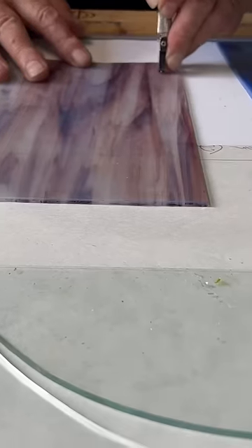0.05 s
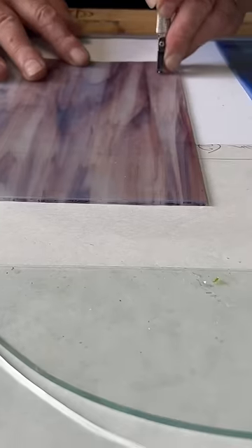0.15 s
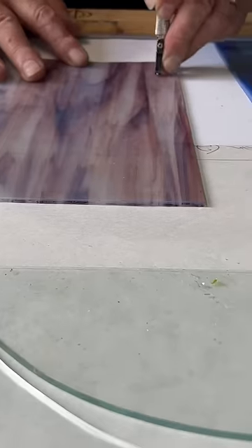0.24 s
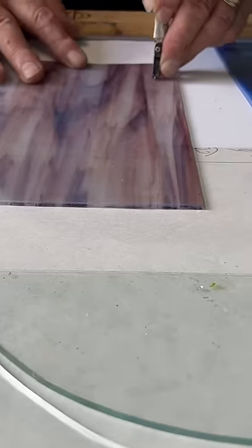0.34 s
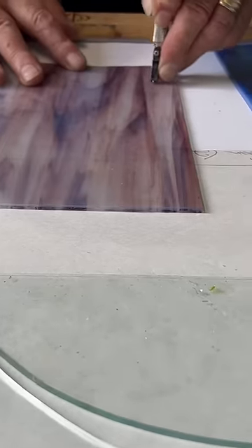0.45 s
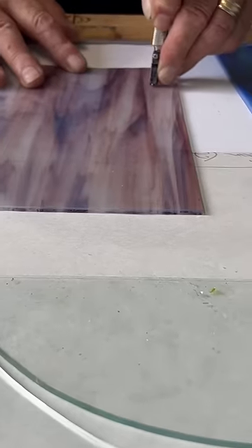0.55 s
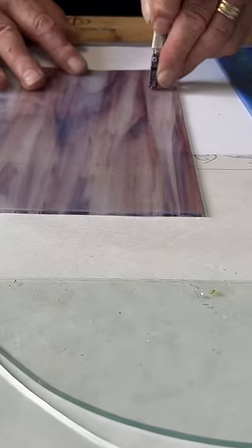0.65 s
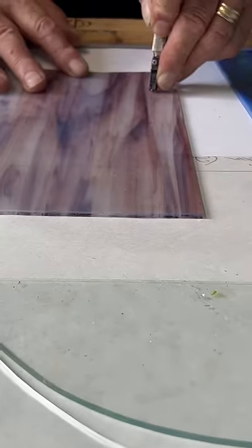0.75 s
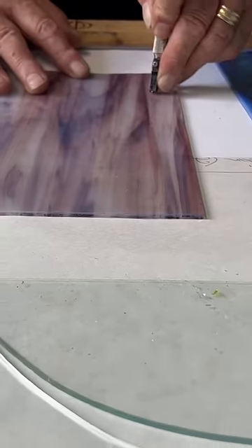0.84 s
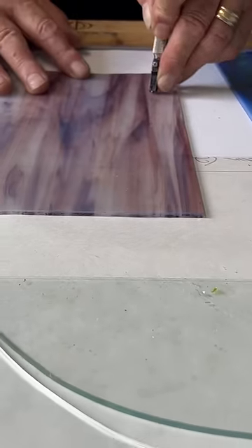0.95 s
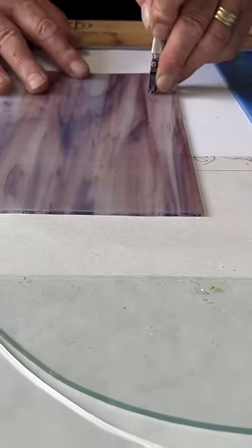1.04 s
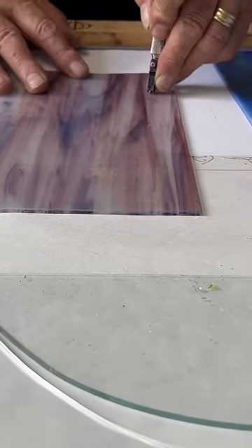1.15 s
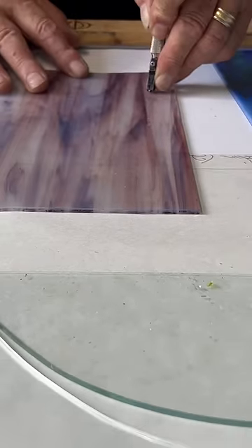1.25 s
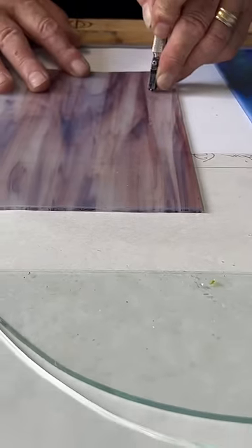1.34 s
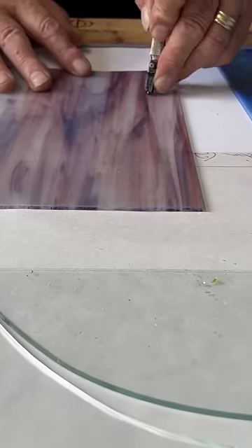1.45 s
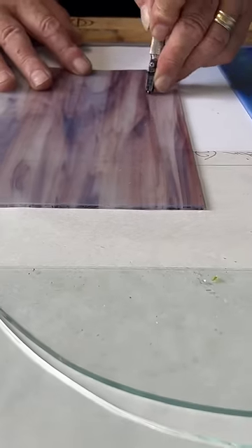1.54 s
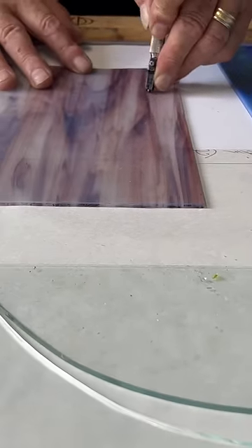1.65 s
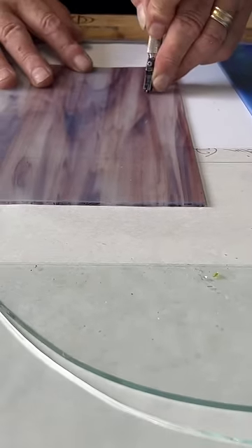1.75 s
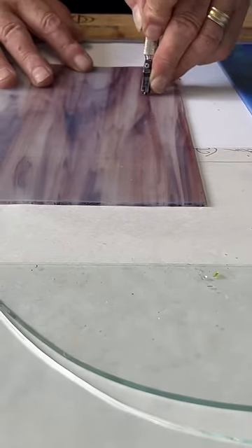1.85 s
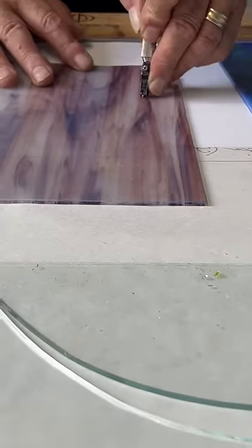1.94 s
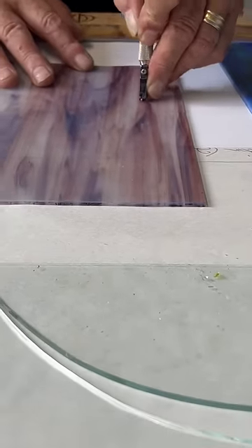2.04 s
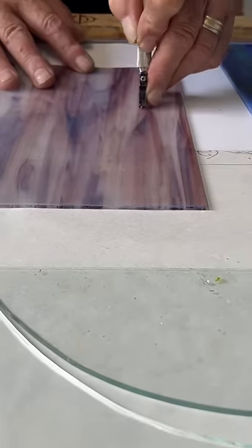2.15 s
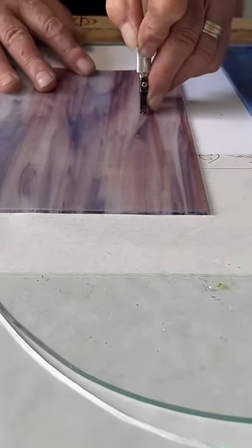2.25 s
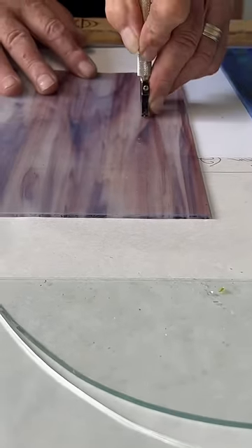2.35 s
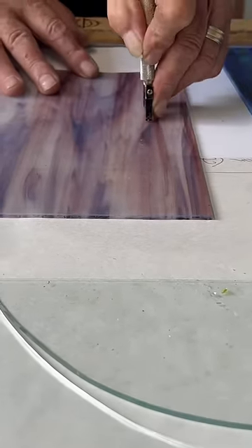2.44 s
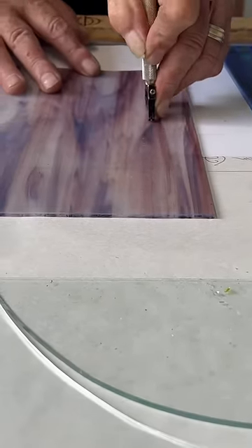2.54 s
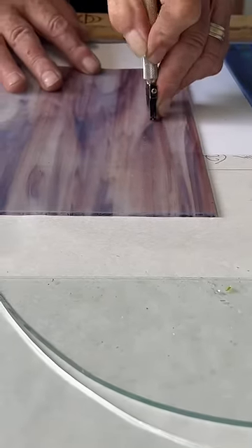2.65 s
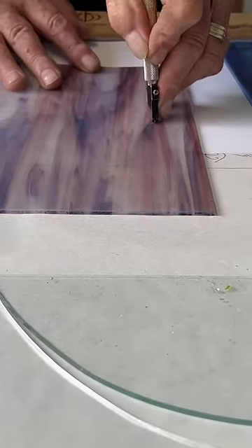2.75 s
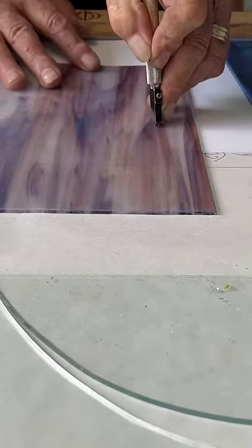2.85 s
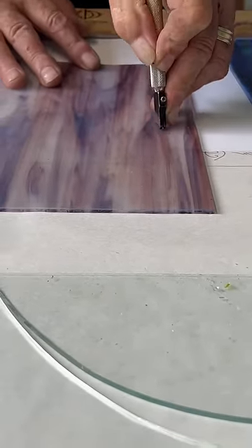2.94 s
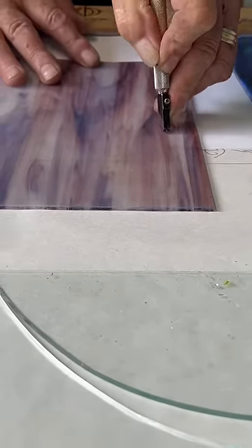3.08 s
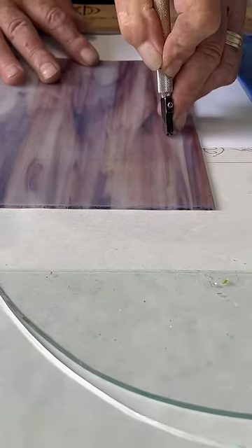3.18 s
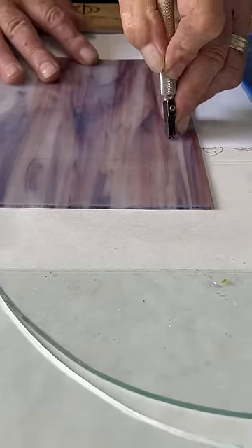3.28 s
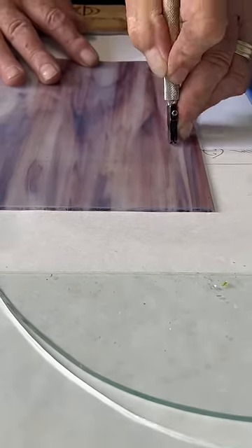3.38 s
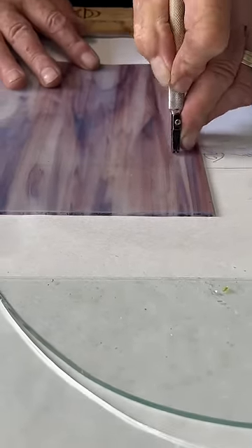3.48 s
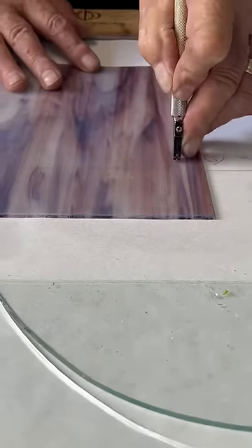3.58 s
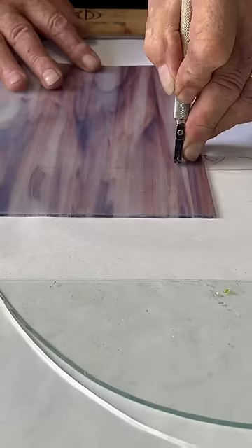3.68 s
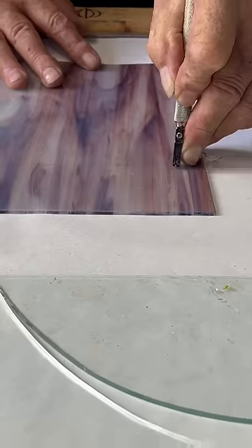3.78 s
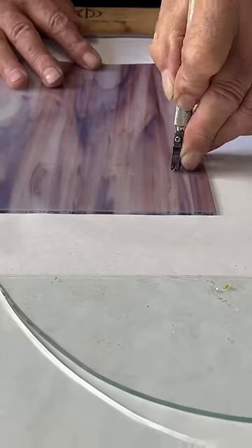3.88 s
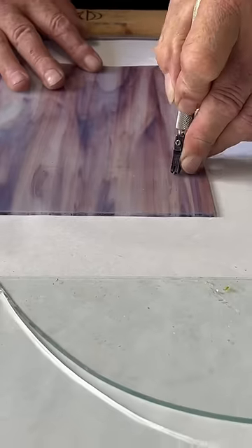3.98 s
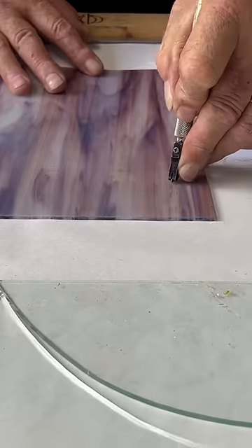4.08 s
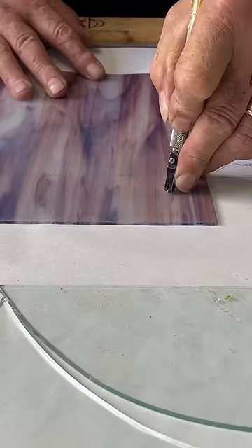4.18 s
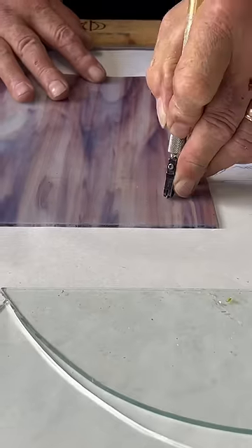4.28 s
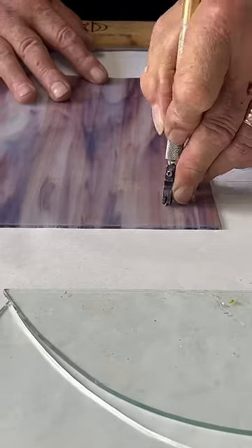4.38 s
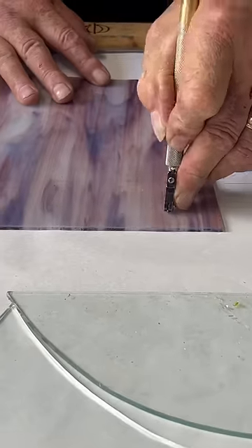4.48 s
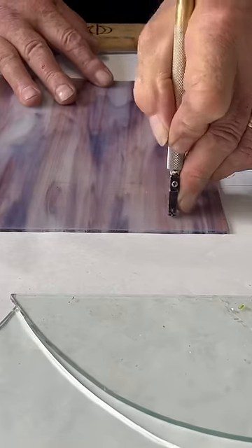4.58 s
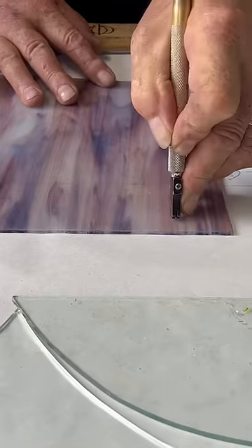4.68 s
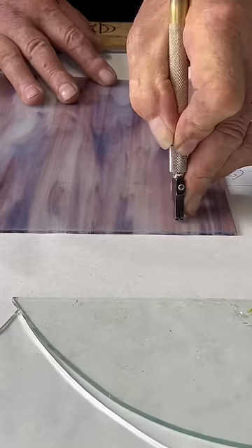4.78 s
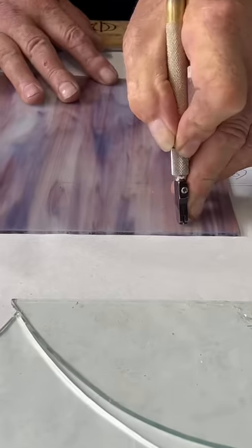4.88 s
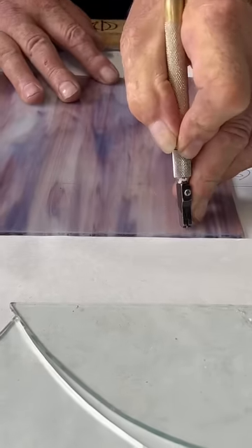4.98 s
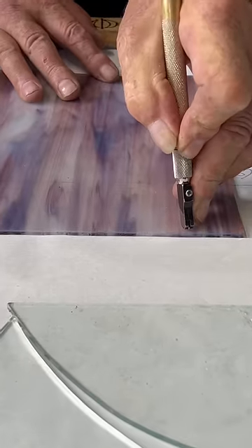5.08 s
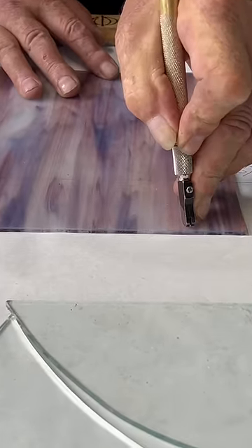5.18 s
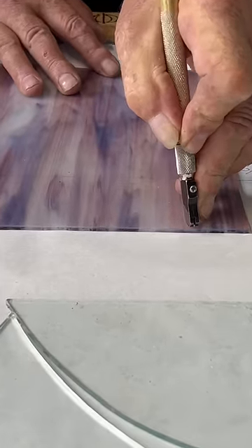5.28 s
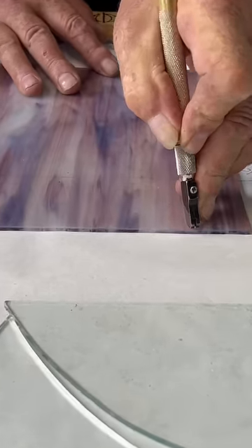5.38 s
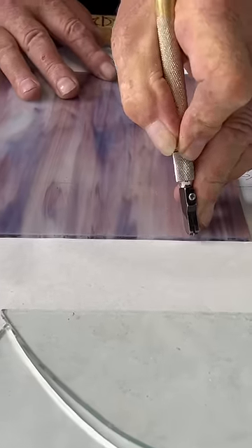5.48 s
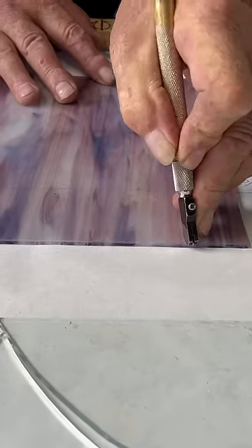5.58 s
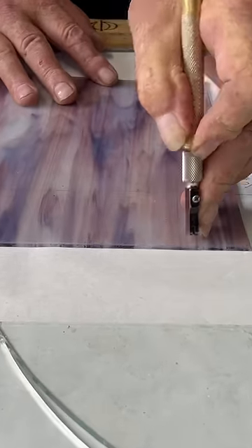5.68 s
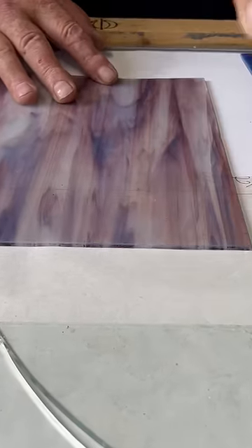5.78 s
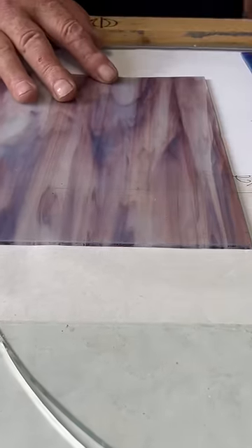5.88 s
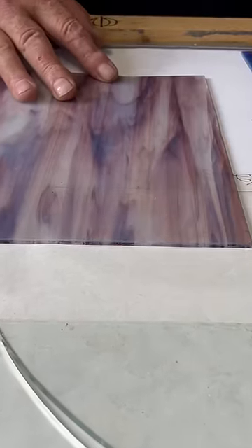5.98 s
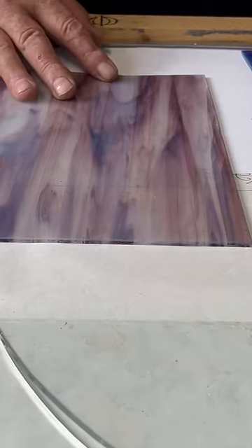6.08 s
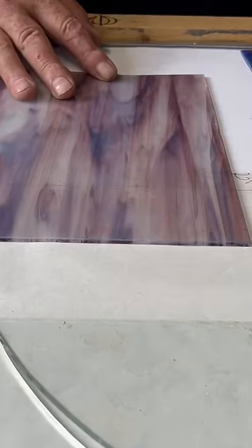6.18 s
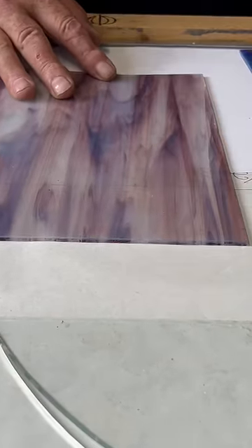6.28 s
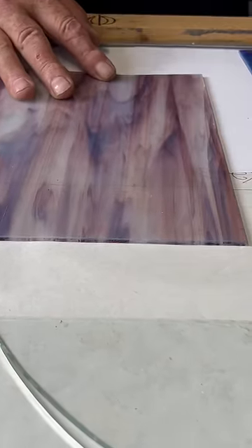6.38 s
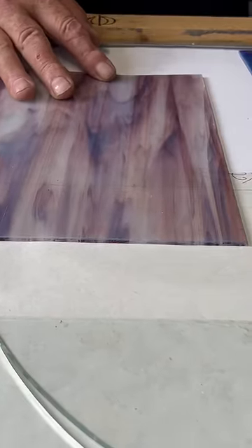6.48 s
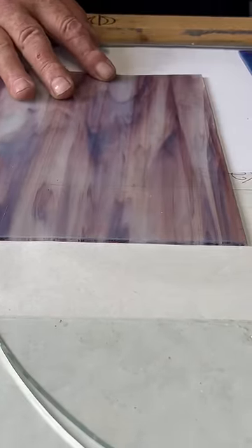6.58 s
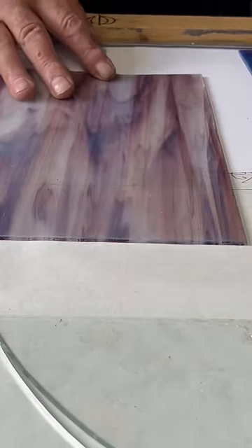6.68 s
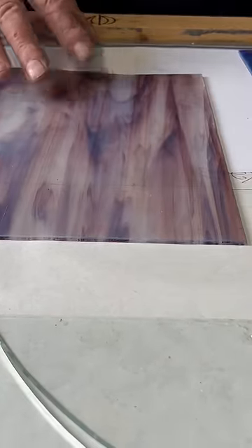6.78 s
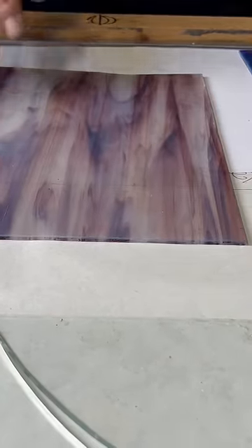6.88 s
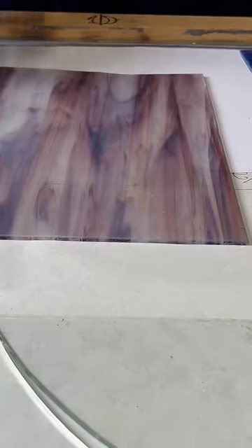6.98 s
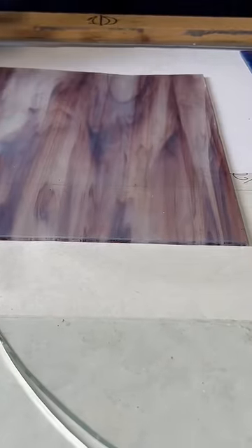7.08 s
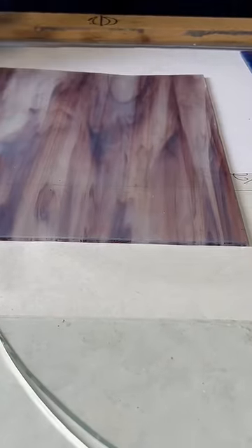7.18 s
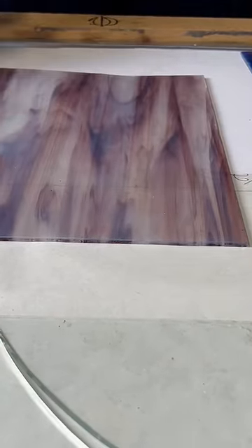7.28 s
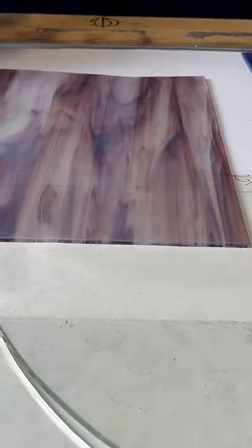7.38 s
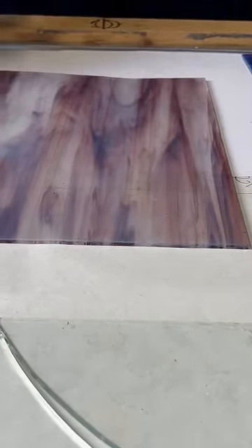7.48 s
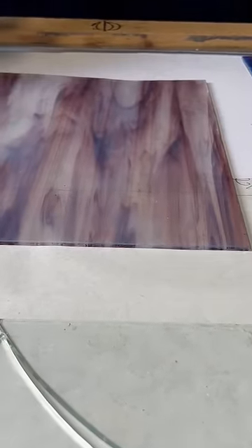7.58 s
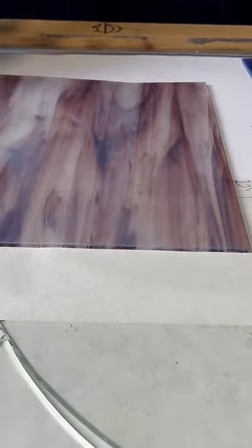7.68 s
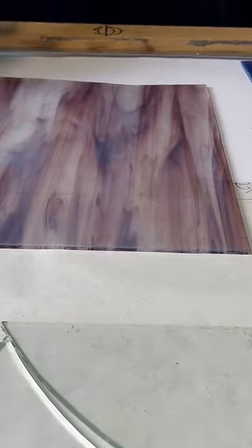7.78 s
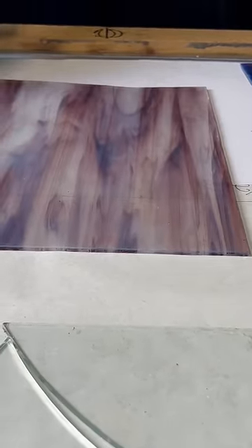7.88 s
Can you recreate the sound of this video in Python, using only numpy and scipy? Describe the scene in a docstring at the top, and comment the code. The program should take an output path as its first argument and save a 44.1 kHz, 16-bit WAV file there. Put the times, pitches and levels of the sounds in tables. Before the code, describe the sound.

A low machine hum wavers throughout in a small workshop, heard closely in stereo, with soft table rumble from leaning hands. Faint paper rustling opens; from 0.3 to 0.9 seconds brittle glass cracks come irregularly with small dull taps. At 1.0 a loud, hard snap rings briefly with a table knock. Sparse cracks follow until 1.8, then gritty, bright scratching runs in bursts to about 2.4, slightly left. From 2.6 to 5.5 the wheel rolls very faintly, with isolated cracks and tiny scratches around 2.9, 3.2 and 3.8-4.6. At 5.52 it drops off the edge: a sharp double snap, glass slap and deep thump with short echo. Light metallic ticks follow at 5.8-5.9, then near quiet. At 6.5 the tool lands with a hollow, ringing clonk and small bounces, slightly right. Ticks, knocks and paper sliding continue from 6.6 to 7.4, with a last small tap at 7.7.

```python
"""Hand glass cutter on a work table

A hand cutter is pulled in fits and starts across a sheet of glass on paper: single cracks, gritty runs, loud snaps.
Clicks scattered into short noise tails ring shaped bodies; dense grains make the runs and decaying sines the thumps.
The wheel drops off the edge and thumps the table; the tool is laid down with a hollow clonk off to the right.
Glass is handled, hands lean and slide in filtered noise, and a machine hums as wavering sines in a small workshop.
"""
import sys
import numpy as np
from scipy import signal
from scipy.fft import rfft, irfft
from scipy.io import wavfile

SR = 44100
rng = np.random.default_rng(int(sys.argv[2]) if len(sys.argv) > 2 else 0)


def persist_wave(psi):
    """Save psi, clipped to +-1, as 16-bit WAV."""
    counts = np.round(np.clip(psi, -1, 1) * 32767).astype(np.int16)
    wavfile.write(sys.argv[1], SR, np.atleast_2d(counts).T)


N = 349713
TIME = np.arange(N) / SR
SHORT = TIME[:8192]
SHORT_HZ = np.fft.rfftfreq(len(SHORT), 1 / SR).clip(1)

# unbroken runs of scoring: (start [s], end [s], level [dB], spectral centre [Hz])
SCORING_RUNS = [(0.553,0.563,-34,3900), (1.8773,1.883,-30.5,4540), (1.89,1.9,-37,4200),
                (1.917,1.996,-36,4240), (2.011,2.195,-35,4530), (2.342,2.426,-34.5,4400),
                (3.23,3.241,-32.5,4000), (4.022,4.044,-34,4600), (4.369,4.413,-37,4500),
                (4.434,4.462,-37,4800), (4.528,4.565,-44,4800)]
# knocks on the table top: (time [s], level [dB], contact softness as cut-off [Hz], rattle t60 [s],
# left minus right [dB], level of the deep table thump [dB])
TABLE_KNOCKS = [(.752,-43.5,1110,0.026,0.5,-51.5), (1.008,-31,448,0.05,-0.5,-32.5),
                (1.372,-52.5,394,0.037,1.5,-32.5), (2.878,-72,347,0.061,0,-37), (3.904,-39,756,0.02,-1,-28),
                (5.527,-17,380,0.066,0.5,-12.5), (6.5212,-23,2050,0.08,-2.5,-42),
                (6.615,-35,900,0.04,-4.5,-33), (6.690,-30.5,1910,0.081,-3,-40),
                (6.733,-38.5,700,0.049,-1.5,-31), (7.110,-28.5,450,0.025,-2.5,-36),
                (7.137,-43,230,0.03,2,-20.5), (7.336,-47,350,.02,4,-46), (7.391,-51.5,1500,0.039,0,-65),
                (7.672,-42,1106,0.01,0,-41.5)]
# broad spectrum of the cracking sheet: (frequency [Hz], level [dB])
GLASS_SPECTRUM = [(150,-16.5), (500,-9), (1100,-11), (1800,-4), (3000,-1.5), (6000,-4), (7500,-4),
                  (9500,-11.5), (10500,-15.5), (15500,-16), (17000,-33.5)]
# a push or roll builds and eases off (s)
PUSH_ATTACK_S, PUSH_RELEASE_S = 0.01, 0.023


def from_db(db):
    """Amplitude factor of a level in dB."""
    return 10 ** (np.asarray(db) / 20)


def unit_energy(x):
    """Scale each channel so that its squares sum to one."""
    return x / np.sqrt(np.sum(x ** 2, axis=-1, keepdims=True) + 1e-20)


def at_hz(points, hz):
    """Read a curve over frequency, straight between its points on a log axis."""
    points = np.array(points)
    return np.interp(np.log(hz), np.log(points[:, 0]), points[:, 1])


def drift(rate):
    """Smooth chance with spread 1 and about `rate` turns a second."""
    return np.interp(TIME * rate, np.arange(8192), rng.standard_normal(8192)) / np.sqrt(2 / 3)


def gesture(start, end, attack_s, release_s):
    """Gain over time: a straight rise from `start`, times an exponential release after `end`."""
    return np.clip((TIME - start) / attack_s, 0, 1) * np.exp(-np.maximum(TIME - end, 0) / release_s)


def stereo_noise(alike, size):
    """White noise in two channels with correlation `alike`."""
    mid, side = rng.standard_normal((2, size))
    alike = np.clip(alike, 0, 1)
    return np.sqrt((1 + alike) / 2) * mid + np.sqrt((1 - alike) / 2) * side * [[1], [-1]]


def panned(x, left_db):
    """Balance by level alone: left minus right in dB."""
    return x * from_db([[left_db / 2], [-left_db / 2]])


def placed(x, left_db):
    """A sound off to one side is louder in the nearer ear and reaches the other a little later."""
    t = TIME[:x.shape[-1]]
    lags = np.maximum(np.array([-left_db, left_db]) * 0.00012, 0)  # seconds
    late = [np.interp(t - lag, t, ear, left=0) for ear, lag in zip(x, lags)]
    return panned(np.array(late), left_db)


def through(x, response):
    """Filter a sound with an impulse response, keeping its length."""
    return signal.oaconvolve(x, np.atleast_2d(response), axes=-1)[:, :x.shape[-1]]


def add(out, s, sound):
    """Mix a sound in at time s."""
    start = max(round(s * SR), 0)
    out[:, start:start + sound.shape[-1]] += sound[..., :N - start]


def body(spectrum, modes=(), extra_db=0):
    """Causal (minimum-phase) response of unit energy: a broad spectrum lifted at each resonance."""
    db = at_hz(spectrum, SHORT_HZ) + extra_db
    for hz, width, lift_db in modes:
        db = db + lift_db / (1 + (2 * (SHORT_HZ - hz) / width) ** 2)
    # folding the cepstrum forward in time gives the minimum phase
    cepstrum = irfft(np.log(from_db(db)))
    cepstrum[len(SHORT) // 2:] = 0
    return unit_energy(irfft(np.exp(2 * rfft(cepstrum))))


def softened(soft_hz, steepness=6.02):
    """Negative dB by frequency: what a soft contact takes from the treble."""
    return -10 * np.log10(1 + (SHORT_HZ / soft_hz) ** steepness)


def contact(t60, scatter_db, alike):
    """A sharp click, then bending waves scattered from the edges of the plate."""
    fading_noise = stereo_noise(alike, size=len(SHORT)) * from_db(-60 * SHORT / t60)
    waves = from_db(scatter_db) * unit_energy(fading_noise)
    waves[:, 0] += 1
    return unit_energy(waves)


def blow(level_db, soft_hz, rattle_s, spectrum, modes):
    """One blow on a body; a soft contact leaves out the treble."""
    hit = contact(t60=rattle_s, scatter_db=6.0, alike=0.44)
    return from_db(level_db) * through(hit, body(spectrum, modes, softened(soft_hz)))


def struck(modes, soft_hz, spread_db=2.0):
    """Decaying modes with new strengths at each blow; a soft contact reaches only the lowest."""
    t = TIME[:SR // 2]
    ring = 0
    for k, (hz, db, t60) in enumerate(modes):
        fade = from_db(db + spread_db * rng.standard_normal() - 60 * t / t60)
        softness = np.hypot(1, (hz / soft_hz) ** 2)
        ring = ring + (-1) ** k * fade * np.sin(2 * np.pi * hz * t) / softness
    return ring


def background(air_db=-51.5, hum_waver_db=4.5, hum_wander=1.0):
    """Wavering machine hum, its phase wandering in radians, over still air."""
    # lines of the machine hum: (frequency [Hz], level [dB])
    hum_lines = [(31,-65), (46.3,-69), (108.5,-56.5), (120,-51.5), (162,-67)]
    # spectrum of the still air: (frequency [Hz], level [dB])
    air_spectrum = [(25,-10.5), (60,-0.5), (110,10), (200,-10), (380,-17), (600,-31.5), (3000,-38),
                    (7000,-46), (10000,-54.5), (16000,-66.5)]
    hum = 0
    for hz, db in hum_lines:
        level = np.sqrt(2) * from_db(db + hum_waver_db * drift(6.5))
        hum = hum + level * np.sin(2 * np.pi * hz * TIME + hum_wander * drift(3.9))
    air = from_db(air_db) * through(stereo_noise(0.55, size=N), body(air_spectrum))
    return hum + air


def workshop(x, gap_s=0.0062, build_s=0.0012):
    """Diffuse echo that builds up after a short gap and dies band by band; the bass is alike in both ears."""
    # strength of the echo: (frequency [Hz], level [dB])
    echo_spectrum = [(100,-7.5), (500,-3), (1300,-2), (2300,-8.5), (3500,-12), (6000,-11), (9000,-6),
                     (16000,-21.5)]
    # reverberation time: (frequency [Hz], t60 [s])
    reverb_times = [(100,0.4), (300,0.45), (1500,0.47), (3000,.46), (5000,0.42), (9000,0.33), (16000,0.35)]
    t, tail = TIME[:SR * 2 // 3], 0
    edges = np.geomspace(60, 17000, num=13)
    for low, high in zip(edges, edges[1:]):
        hz = np.sqrt(low * high)
        band_filter = signal.butter(2, [low, high], "band", fs=SR, output="sos")
        band = signal.sosfilt(band_filter, stereo_noise(1 / (1 + (hz / 380) ** 2), size=len(t)))
        fade = np.clip((t - gap_s) / build_s, 0, 1) * from_db(-60 * t / at_hz(reverb_times, hz))
        strength = from_db(at_hz(echo_spectrum, hz)) * np.sqrt(2 * (high - low) / SR)
        tail = tail + unit_energy(band * fade) * strength
    return through(x, tail)


def effort(resting_db=-8):
    """How hard the hands bear down, as a gain: their resting weight plus the pushes."""
    # spells of bearing down on the table: (start [s], end [s], effort [dB])
    pushes = [(0.342,0.746,-5.5), (1.372,1.46,-1.5), (1.84,2.225,-3), (2.723,2.942,-1), (3.052,3.142,-1.5),
              (3.448,3.514,-2), (3.68,3.76,-4), (4.044,4.169,1.5), (4.335,4.467,0.5), (6.592,6.794,1.5),
              (7.01,7.212,4), (7.55,7.687,-6.5)]
    pushing = sum(from_db(db) * gesture(start, end, PUSH_ATTACK_S, PUSH_RELEASE_S)
                  for start, end, db in pushes)
    return np.hypot(from_db(resting_db), pushing)


def hands(rumble_db=-43.0, rub_db=-54.5, rub_growth=1.5):
    """Leaning hands make the table rumble; the palms rub unevenly, growing faster with effort."""
    # spectrum of the rumbling table: (frequency [Hz], level [dB])
    rumble_spectrum = [(20,-48.5), (40,-14.5), (65,4), (85,-11.5), (115,4), (145,-5.5), (200,-26.5),
                       (600,-52), (3000,-79.5)]
    # spectrum of the rubbing palms: (frequency [Hz], level [dB])
    palm_spectrum = [(60,-14), (160,4.5), (250,-1), (330,-16.5), (500,-15), (800,-22), (1500,-29),
                     (5000,-63.5)]
    weight = effort()
    waver_db = 2.5 * drift(12)
    leaning = stereo_noise(0.92, size=N) * weight * from_db(rumble_db)
    rubbing = stereo_noise(1.0, size=N) * weight ** rub_growth * from_db(rub_db + waver_db)
    return through(leaning, body(rumble_spectrum)) + through(rubbing, body(palm_spectrum))


def friction(level, response, grain_db, grain_rate):
    """Rubbing: a hiss that catches and lets go in small grains."""
    grip = np.sqrt(N) * unit_energy(from_db(grain_db * drift(grain_rate)))
    return through(stereo_noise(0.19, size=N) * grip * level, response)


def slap_modes():
    """Resonances of the sheet slapping on the table."""
    # (frequency [Hz], width [Hz], lift [dB])
    return [(430,80,13.5), (1295,210,8), (2000,260,5), (2600,260,6.5)]


def slap_spectrum():
    """Broad spectrum of the sheet slapping on the table."""
    # (frequency [Hz], level [dB])
    return [(80,-28), (250,-9), (700,-10), (1000,-7.5), (1800,-4), (3000,-7), (5000,-11.5), (9000,-2.5)]


def sliding(catches_per_s=30, catch_db=24.0, soft_hz=2200):
    """Fingers and glass shift on the paper with a fine hiss, in which the sheet catches and taps softly."""
    # strokes of paper and fingers: (start [s], start of the release [s], level [dB])
    strokes = [(0,-0.08,-58), (0.179,0.206,-59), (0.41,0.508,-59), (1.363,1.34,-69), (5.85,6,-63.5),
               (6.991,7,-55.5), (7.203,7.5,-62.5), (7.804,8,-56.5)]
    # spectrum of the paper: (frequency [Hz], level [dB])
    paper_spectrum = [(200,1.5), (700,1), (1800,-1.5), (3500,-6), (6000,-10.5), (7500,-18.5), (9500,-20.5),
                      (11000,-47), (16000,-49.5)]
    level = sum(from_db(db) * gesture(start, end, attack_s=0.0032, release_s=0.14)
                for start, end, db in strokes)
    catches = (rng.random(N) < catches_per_s / SR) * rng.standard_normal(N) * level * from_db(catch_db)
    sheet = body(slap_spectrum(), slap_modes(), softened(soft_hz))
    caught = through(np.array([catches, catches]), sheet)
    return caught + friction(level, body(paper_spectrum), grain_db=2.2, grain_rate=600)


def glass_modes(depth):
    """The resonances of the sheet stand out more the harder the wheel is pressed in."""
    # resonances (and notches between them) of sheet and cutter head: (frequency [Hz], width [Hz], lift [dB])
    sheet_modes = [(778,110,6), (1833,52,6), (2020,95,8.5), (2390,65,-1.5), (2640,200,5.5), (3120,190,9),
                   (3617,110,8.5), (4060,270,-3.5), (4704,220,8.5), (5100,180,-1.5), (5590,370,6),
                   (6093,310,8), (6960,250,0.5), (8380,1100,5.5), (9300,250,6)]
    return [(hz, width, depth * lift_db) for hz, width, lift_db in sheet_modes]


def tilted(centre_hz, swell_hz=1700, middle_hz=4540, tilt_db=3.0):
    """dB by frequency for a brighter or duller crack; a dull one swells the lowest band the sheet radiates well."""
    # tilt in dB per octave, for each octave that the centre lies from the middle; mirrored below the swell
    mirrored_hz = np.maximum(SHORT_HZ, swell_hz ** 2 / SHORT_HZ).clip(None, 12000)
    return tilt_db * np.log2(centre_hz / middle_hz) * np.log2(mirrored_hz / middle_hz)


def travelling(drive, start, end, spectrum, centre_hz, depth, travel_s=0.045, travel_db=2.5):
    """The sheet rung by a moving wheel: the balance of its resonances fades from one place to the next."""
    out, hop = np.zeros((2, N)), round(travel_s * SR)
    for first in range(max(round(start * SR) - hop, 0), round(end * SR) + hop, hop):
        modes = [(hz, width, lift_db + travel_db * rng.standard_normal())
                 for hz, width, lift_db in glass_modes(depth)]
        piece = drive[:, first:first + 2 * hop] * np.hanning(2 * hop)
        sheet = body(spectrum, modes, tilted(centre_hz))
        add(out, first / SR, signal.fftconvolve(piece, sheet[None], axes=-1))
    return out


def rolling(waver_db=3.0, gain_db=-0.5):
    """The rolling wheel stirs the sheet lightly, in fine grains, swelling as the hand's speed wavers."""
    # faint rub until the wheel drops off the edge: (start [s], end [s], level [dB], spectral centre [Hz])
    rolls = [(2.618,2.997,-68.5,1600), (3.042,3.503,-65.5,3200), (3.56,4.366,-70,4500),
             (4.6,5.51,-66.5,6980)]
    # spectrum of the rolling wheel: (frequency [Hz], level [dB])
    wheel_spectrum = [(200,8), (700,9.5), (1200,8), (2000,8), (3000,4.5), (5000,4.5), (6500,0), (9000,-8),
                      (10500,-21), (16000,-21.5)]
    grain_db = 2.5 * drift(350)
    rub = stereo_noise(0.13, size=N) * from_db(waver_db * drift(11) + grain_db)
    out = np.zeros((2, N))
    for start, end, db, hz in rolls:
        drive = rub * gesture(start, end, PUSH_ATTACK_S, PUSH_RELEASE_S)
        rolled = travelling(drive, start, end + PUSH_RELEASE_S, wheel_spectrum, hz, depth=0.87)
        out += from_db(db + gain_db) * rolled
    return out


def taps(gain_db=17.5, width_octaves=0.31):
    """A padded touch rings briefly in one broad, well-damped resonance."""
    # small dull taps and scuffs of fingers, tool and paper: (time [s], level [dB], centre [Hz], t60 [s])
    touches = [(0.4453,-39.5,1270,.02), (.5075,-45.5,890,0.009), (.683,-40,880,0.015),
               (0.7235,-33,895,.012), (.776,-42.5,761,.035), (.803,-42,1100,0.03), (.820,-46,1600,.015),
               (.842,-49,1400,.02), (.859,-49,1400,0.011), (0.935,-55.5,1400,0.011), (1.279,-55,1300,0.013),
               (1.320,-49,1200,.012), (2.272,-48.5,790,0.024), (4.95,-56,1496,.04), (5.03,-54.5,1700,.04),
               (5.9893,-51.5,3130,.012), (6.691,-27,565,0.04), (7.111,-31,556,.012), (7.127,-30,1480,0.028),
               (7.255,-44,1480,.08), (7.673,-32,1400,.02)]
    out = np.zeros((2, N))
    for s, level_db, centre_hz, t60 in touches:
        octaves = np.log2(SHORT_HZ / centre_hz)
        pad = body([(centre_hz, 0)], extra_db=-20 * np.log10(1 + (octaves / width_octaves) ** 2))
        touch = contact(t60=t60, scatter_db=9.0, alike=0.79)
        add(out, s, from_db(level_db + gain_db) * through(touch, pad))
    return out


def ticks(gain_db=5.0):
    """Hard little touches of the tool and loose glass ring the metal."""
    # light ticks of handling: (time [s], level [dB])
    touches = [(3.904,-36), (5.778,-37), (5.8501,-23.5), (5.871,-26.5), (5.916,-34.5), (6.5222,-15.5),
               (6.618,-22.5), (6.626,-21.5), (6.6898,-13.5), (6.743,-26), (6.7565,-28.5), (6.9438,-33.5),
               (7.0703,-12), (7.0811,-14.5), (7.1268,-28), (7.222,-31.5), (7.388,-29), (7.6732,-24)]
    # spectrum of the metal tool: (frequency [Hz], level [dB])
    metal_spectrum = [(300,0.5), (1500,1.5), (3000,6), (5500,7.5), (8000,7), (9500,-5.5), (11000,-3),
                      (16000,-7.5)]
    # its resonances: (frequency [Hz], width [Hz], lift [dB])
    metal_modes = [(7650,300,7), (9220,600,10)]
    out = np.zeros((2, N))
    for s, level_db in touches:
        touch = contact(t60=0.022, scatter_db=12, alike=0.5)
        add(out, s + 0.00069, from_db(level_db + gain_db) * touch)
    return through(out, body(metal_spectrum, metal_modes))


def bounces(gain_db=-3.0):
    """The cutter is laid down: a hollow clonk rings on through its bounces, a little differently in each ear."""
    # landings: (time [s], level [dB], contact softness as cut-off [Hz])
    landings = [(6.5215,-25,3000), (6.5258,-25.5,2600), (6.541,-29,1500), (6.582,-34.5,1000),
                (6.615,-36,1100), (6.690,-43,2500)]
    # what rings under the cutter: (frequency [Hz], level [dB], t60 [s])
    hollow_modes = [(562,-4,0.11), (637.6,-7.5,.23), (865,-13,0.34), (969,-10,0.35), (1044,-3.5,0.42),
                    (1147,-10,0.29), (1300,-8,.3), (1563,-7,0.086), (1840,-10,.22), (1955,-6,.2)]
    out = np.zeros((2, N))
    for s, level_db, soft_hz in landings:
        clonk = np.array([struck(hollow_modes, soft_hz) for ear in out])
        add(out, s, from_db(level_db + gain_db) * clonk)
    return placed(out, left_db=-2.0)


def thump_events(knock_soft_hz=600, lurch_soft_hz=130, lurch_db=-3):
    """Weight lands on the table with every knock, and softly where a run stops with a lurch of the hand."""
    knocked = [(s, thump_db, min(soft_hz, knock_soft_hz))
               for s, _, soft_hz, *_, thump_db in TABLE_KNOCKS]
    lurches = [(end, db + lurch_db, lurch_soft_hz) for _, end, db, _ in SCORING_RUNS]
    return knocked + lurches


def thumps(gain_db=-3.0):
    """The whole table rings in its deep modes."""
    # (frequency [Hz], level [dB], t60 [s])
    table_modes = [(65.7,-3.5,0.29), (92,1,.11), (130.1,-4.5,0.29), (238.4,-7,0.17), (368,-14.5,0.14),
                   (443,-18,0.32), (504,-18.5,0.18), (630,-22,0.13)]
    out = np.zeros((2, N))
    for s, level_db, soft_hz in thump_events():
        add(out, s, from_db(level_db + gain_db) * struck(table_modes, soft_hz))
    return out


def knocks(gain_db=25.5):
    """Blows on the table top, each in its own place."""
    # spectrum of the table top: (frequency [Hz], level [dB])
    top_spectrum = [(80,-19), (200,7.5), (350,-6.5), (700,-1.5), (1200,1), (2200,0.5), (3200,-26),
                    (8000,-38)]
    # its resonances: (frequency [Hz], width [Hz], lift [dB])
    top_modes = [(544,100,8), (880,38,2.5), (1080,96,2.5), (1387,450,-2), (2060,150,4)]
    out = np.zeros((2, N))
    for s, level_db, soft_hz, rattle_s, left_db, _ in TABLE_KNOCKS:
        knock = blow(level_db + gain_db, soft_hz, rattle_s, top_spectrum, top_modes)
        add(out, s, placed(knock, left_db))
    return out


def slaps(gain_db=15.0):
    """The sheet jumps and hits the table through the paper."""
    # the sheet slapping and rocking: (time [s], level [dB], contact softness as cut-off [Hz], rattle t60 [s])
    sheet_hits = [(0.887,-36.5,3730,0.017), (1.003,-22,2100,0.059), (5.526,-14.5,2623,0.0095),
                  (5.535,-15.5,4680,0.3), (6.914,-37.5,2930,0.041), (7.000,-31.5,2940,0.022),
                  (7.021,-37.5,2920,0.015), (7.672,-36,4170,0.0049)]
    out = np.zeros((2, N))
    for s, level_db, soft_hz, rattle_s in sheet_hits:
        add(out, s, blow(level_db + gain_db, soft_hz, rattle_s, slap_spectrum(), slap_modes()))
    return out


def pings(gain_db=-5.0, soft_hz=16000):
    """The steel wheel, jolted on its axle by a snap, gives a short, high ring."""
    # (time [s], level [dB])
    jolts = [(1.001,-23.5), (1.0128,-24)]
    # ring of the wheel: (frequency [Hz], level [dB], t60 [s])
    wheel_modes = [(7900,-5.5,.02), (8090,-1,0.029), (8400,-4.5,.018), (11500,-11.5,0.018)]
    out = np.zeros((2, N))
    for s, level_db in jolts:
        add(out, s, from_db(level_db + gain_db) * struck(wheel_modes, soft_hz))
    return out


def snaps(gain_db=15.5):
    """The wheel jumps at an edge and steel strikes glass: hard, very short bursts."""
    # (time [s], level [dB], spectral centre [Hz], t60 [s])
    edge_jumps = [(1.0002,-6,2500,0.012), (5.5196,-10,5600,0.016), (5.5258,-5,3900,0.016)]
    # spectrum of a snap: (frequency [Hz], level [dB])
    snap_spectrum = [(150,-22), (600,-16.5), (1100,-8), (2000,-2.5), (2800,-1), (4800,-1), (6100,-4.5),
                     (6900,-13), (8000,-8), (9500,-15), (16000,-23.5)]
    out = np.zeros((2, N))
    for s, level_db, centre_hz, t60 in edge_jumps:
        sheet = body(snap_spectrum, glass_modes(depth=0.26), tilted(centre_hz))
        strike = contact(t60=t60, scatter_db=11.0, alike=0.48)
        add(out, s, from_db(level_db + gain_db) * through(strike, sheet))
    return out


def scoring(per_s=2000, size_db=-1.0, grip_db=1.8, ring_s=0.0011, click_db=-6.0, gain_db=-1.5):
    """While the wheel bites, tiny cracks follow each other densely; the grip wavers."""
    sizes = from_db(size_db * rng.exponential(1, N).clip(0, 3) + grip_db * drift(160))
    grains = np.sqrt(N) * unit_energy(sizes * (rng.random(N) < per_s / SR))
    # each crack is a click that scatters into bending waves, which the paper soaks up within milliseconds
    keep = np.exp(-1 / (ring_s * SR))
    energy = signal.lfilter([1 - keep], [1, -keep], grains ** 2 + 1e-18)
    clicks = from_db(click_db) * grains * rng.choice([-1, 1], N)
    waves = np.sqrt(energy) * stereo_noise(0.13, size=N) + clicks
    out = np.zeros((2, N))
    for start, end, db, hz in SCORING_RUNS:
        drive = waves * ((TIME >= start) & (TIME < end))
        out += from_db(db + gain_db) * travelling(drive, start, end, GLASS_SPECTRUM, hz, depth=1.34)
    return out


def crack_events(gap_s=0.0069, rise_db=0.5, bite_db=-32, bite_hz=5380):
    """Every crack: bunches that gain a little level crack by crack, and the bright bite opening each run."""
    # cracks under the wheel: (time [s], level of the first [dB], spectral centre [Hz], cracks in the bunch)
    bunches = [(0.312,-29,4800,1), (0.413,-36.5,2800,1), (0.443,-30.5,2600,1), (0.453,-33.5,4000,1),
               (0.4813,-30,3080,3), (0.5415,-25.5,3860,1), (0.605,-35,1783,1), (0.629,-23,2970,1),
               (0.649,-28.5,4000,1), (0.665,-29.5,3480,2), (0.7509,-23.5,6500,1), (0.977,-37.5,3400,1),
               (1.111,-28,2970,1), (1.3568,-29.5,2980,1), (1.5325,-31.5,1550,1), (1.67,-29,3500,1),
               (1.6798,-30.5,4500,2), (1.777,-25,5430,1), (2.8786,-29,5900,1), (3.7601,-27.5,3640,1),
               (3.9702,-25.5,3630,1), (4.5933,-28,5800,1)]
    bunched = [(s + k * gap_s, db + k * rise_db, hz)
               for s, db, hz, count in bunches for k in range(round(count))]
    return bunched + [(start, bite_db, bite_hz) for start, *_ in SCORING_RUNS]


def cracks(gain_db=15.0):
    """Single cracks ring the paper-damped sheet, each brighter or duller by its spectral centre."""
    out = np.zeros((2, N))
    for s, level_db, centre_hz in crack_events():
        sheet = body(GLASS_SPECTRUM, glass_modes(depth=1), tilted(centre_hz))
        crack = contact(t60=0.023, scatter_db=14.0, alike=0.1)
        add(out, s + 0.00087, from_db(level_db + gain_db) * through(crack, sheet))
    return out


def towards_left(x):
    """The cutter works left of centre, which shows most in the upper middle."""
    # (frequency [Hz], left minus right [dB])
    cutter_side = [(1000,-0.5), (2000,-0.5), (4000,6), (8000,4), (12000,-2)]
    side_db = at_hz(cutter_side, np.fft.rfftfreq(N, 1 / SR).clip(1))
    return irfft(rfft(x) * from_db([side_db / 2, -side_db / 2]), N)


def scene():
    """Direct sounds plus the echo of the workshop, over leaning hands and the background."""
    cutter = cracks() + scoring() + snaps() + pings()
    sheet, tapped, ticked = slaps(), taps(), ticks()
    knocked = knocks() + bounces()
    table, rubbing = thumps(), sliding() + rolling()
    direct = towards_left(cutter) + panned(sheet, left_db=4.5) + knocked + tapped
    direct = direct + placed(ticked, left_db=-0.7)
    # each source feeds the room according to how it radiates
    radiated = panned(cutter, left_db=2.5) + from_db(4.0) * sheet + from_db(-1.0) * knocked
    radiated = radiated + from_db(0.5) * ticked + from_db(-3.5) * tapped
    echo = workshop(radiated + from_db(-8.0) * table + rubbing)
    return direct + table + rubbing + echo + hands() + background()


def record(dry, apart_hz=210.0, cutoff_hz=16300):
    """Two close microphones hear the bass nearly alike; the top is cut steeply."""
    mid, side = (dry[0] + dry[1]) / 2, (dry[0] - dry[1]) / 2
    bass_filter = signal.butter(2, apart_hz, fs=SR, output="sos")
    side = side - 0.8 * signal.sosfiltfilt(bass_filter, side)
    top_cut = signal.ellip(10, 0.2, 80, cutoff_hz, fs=SR, output="sos")
    return signal.sosfilt(top_cut, [mid + side, mid - side])


dry = scene()
out = record(dry)
persist_wave(out)
```